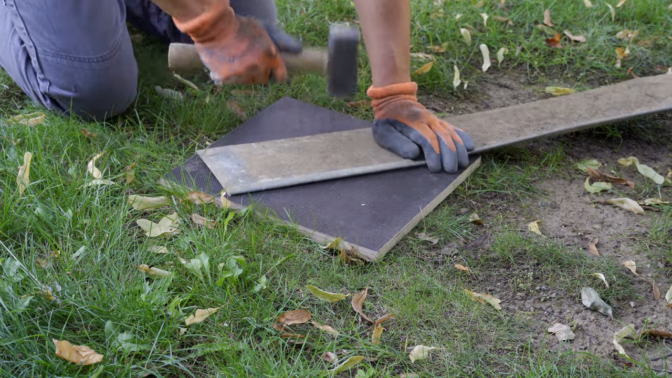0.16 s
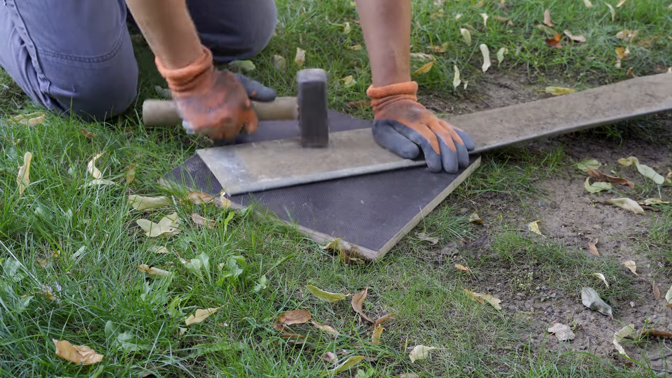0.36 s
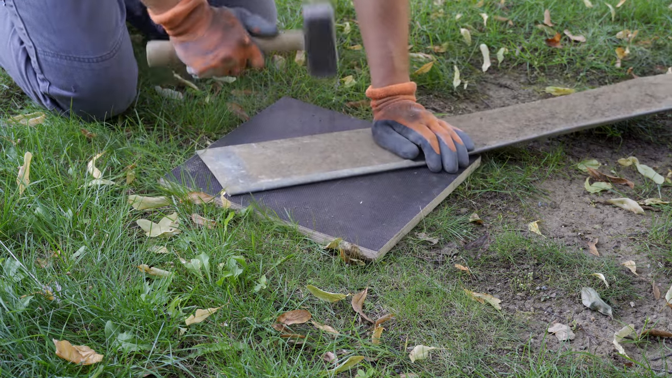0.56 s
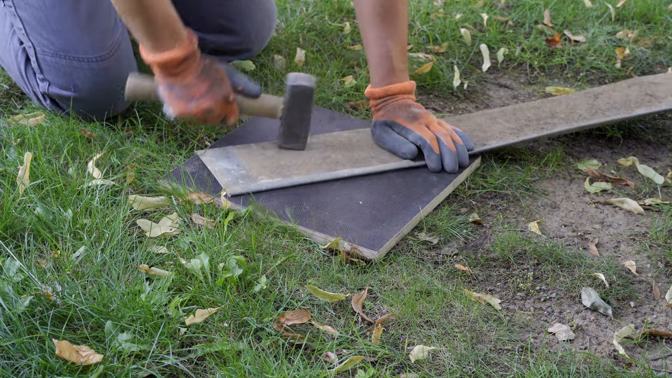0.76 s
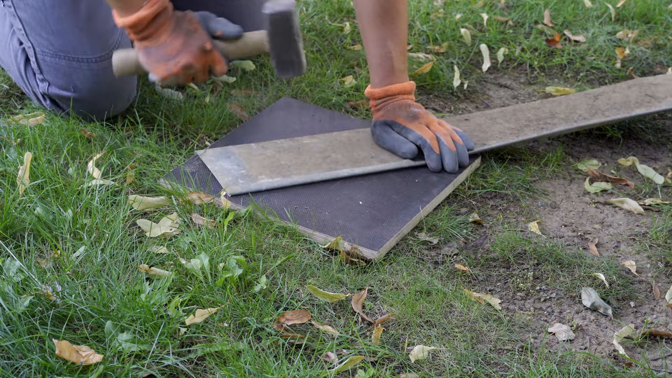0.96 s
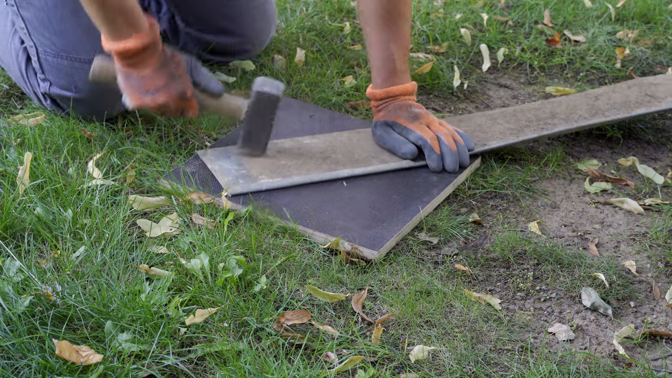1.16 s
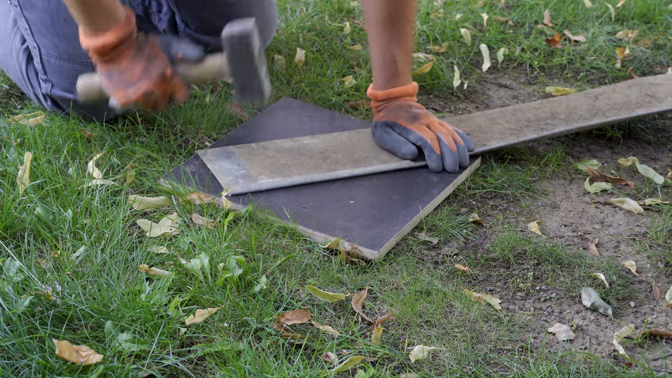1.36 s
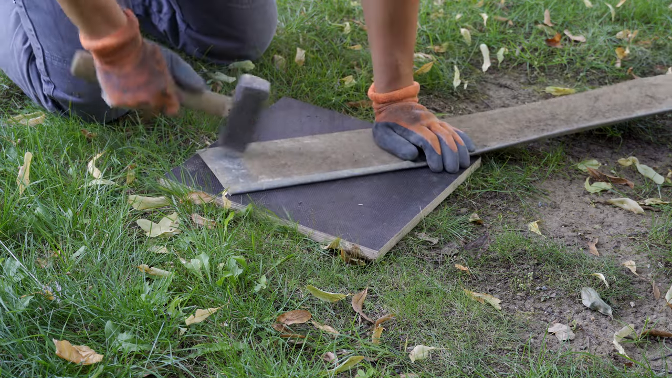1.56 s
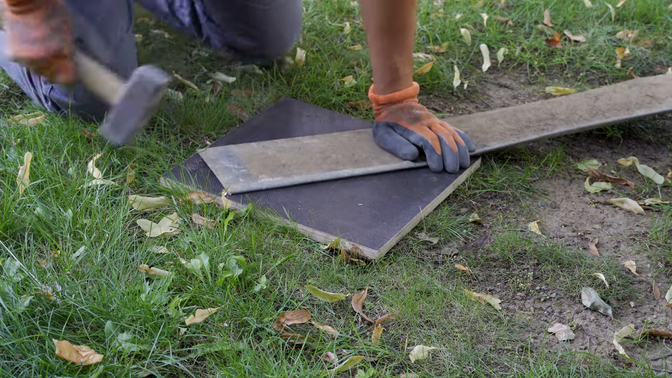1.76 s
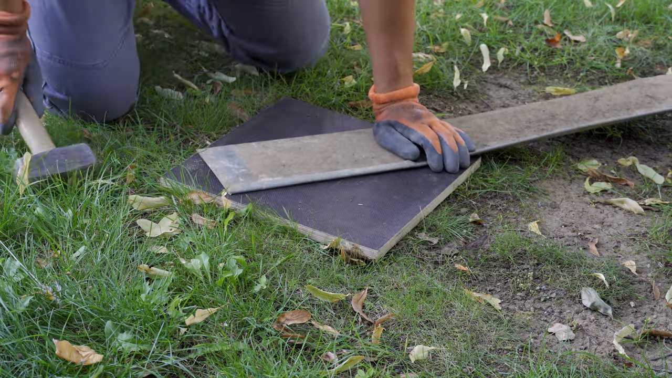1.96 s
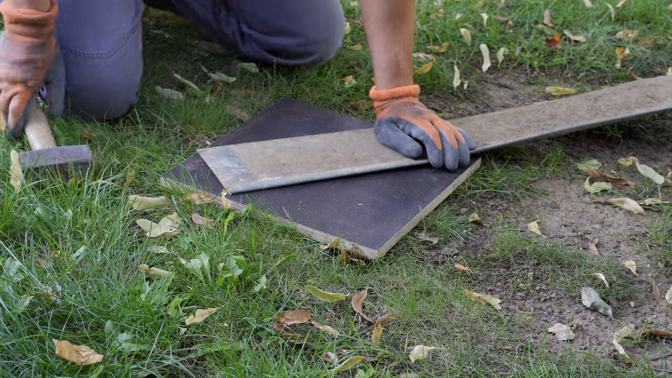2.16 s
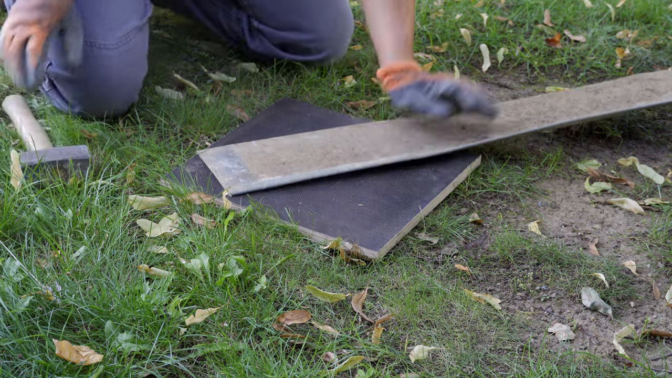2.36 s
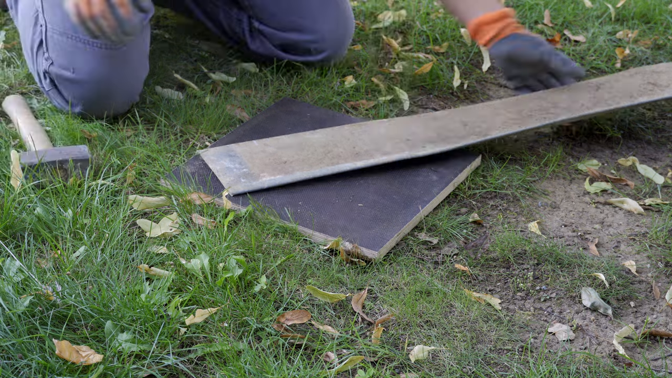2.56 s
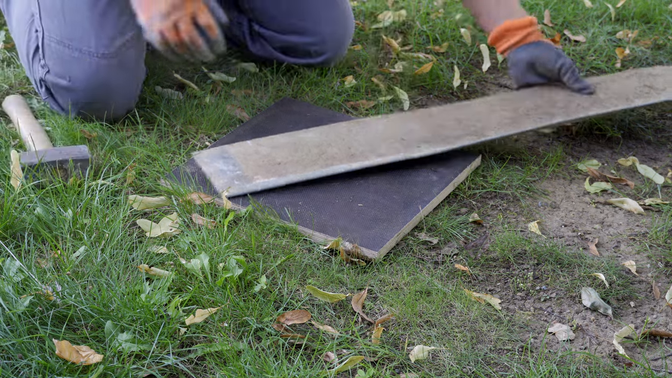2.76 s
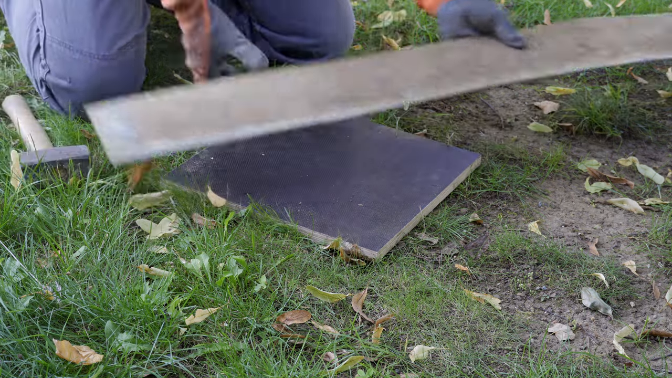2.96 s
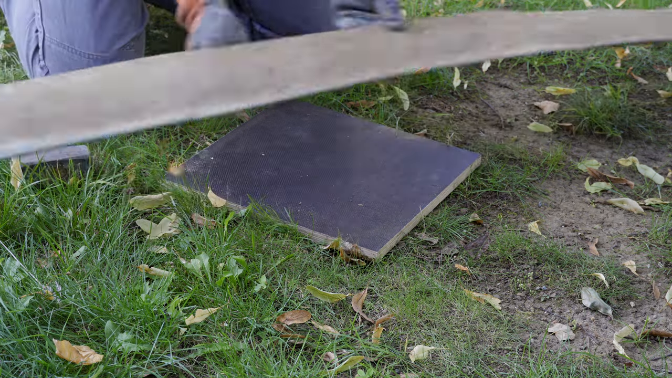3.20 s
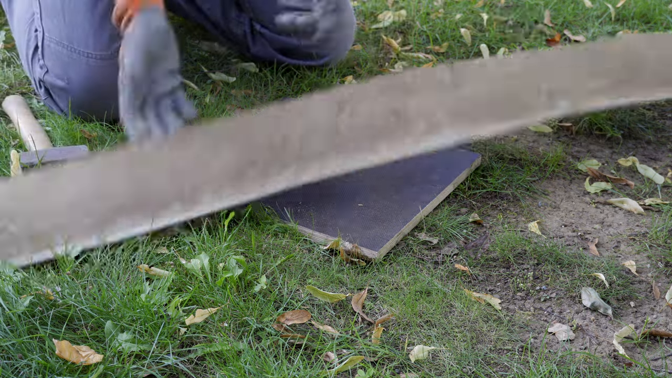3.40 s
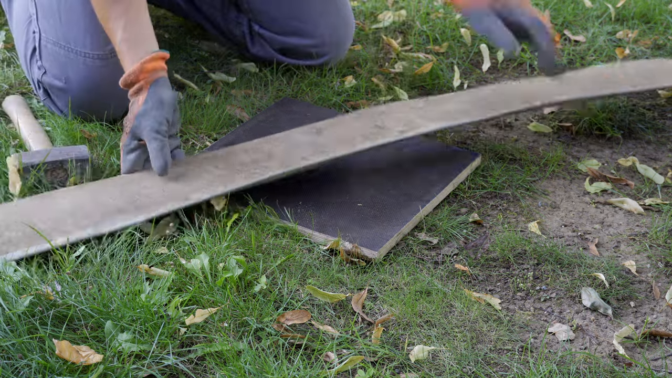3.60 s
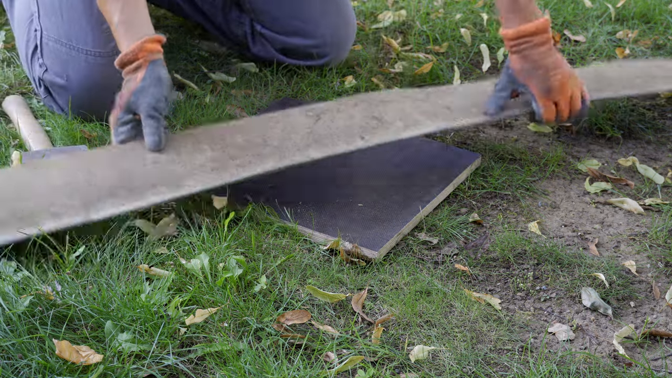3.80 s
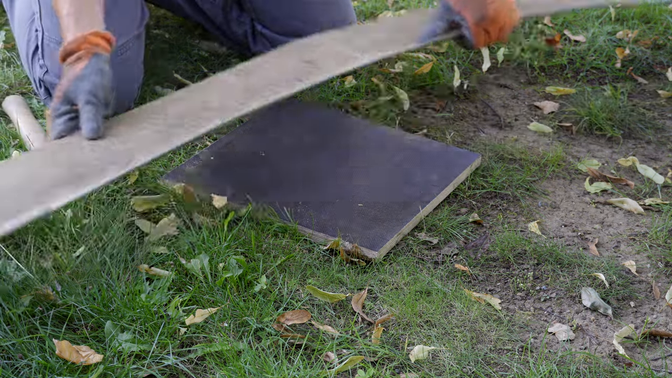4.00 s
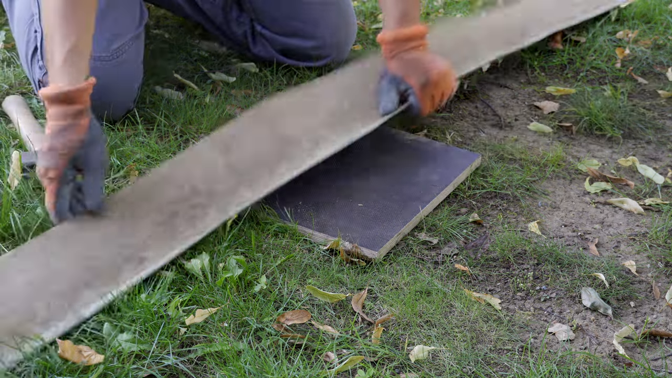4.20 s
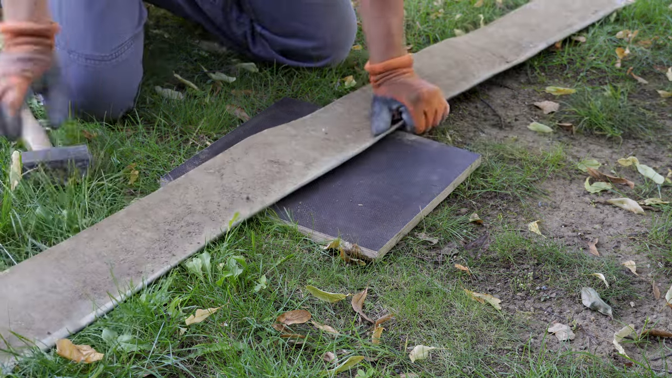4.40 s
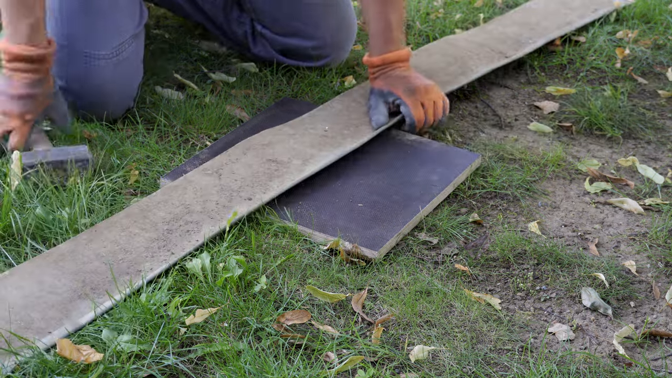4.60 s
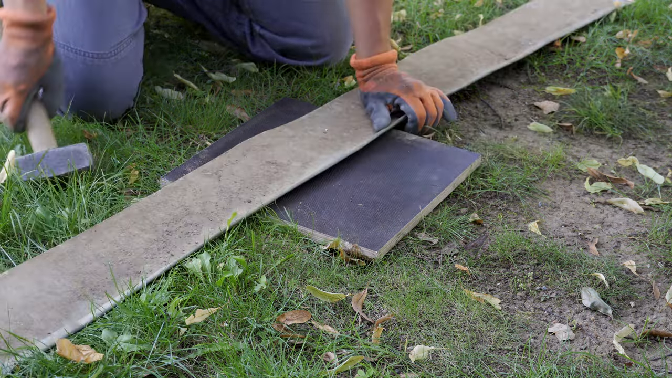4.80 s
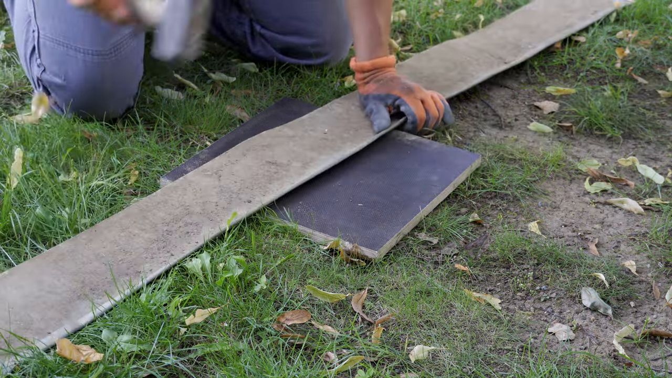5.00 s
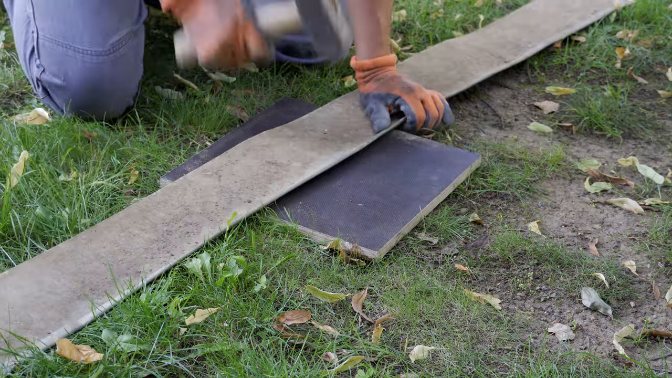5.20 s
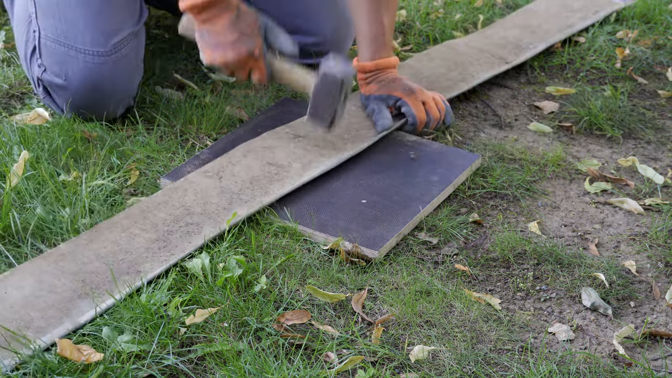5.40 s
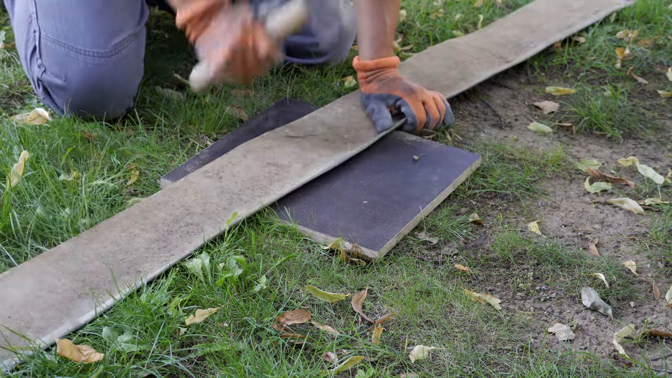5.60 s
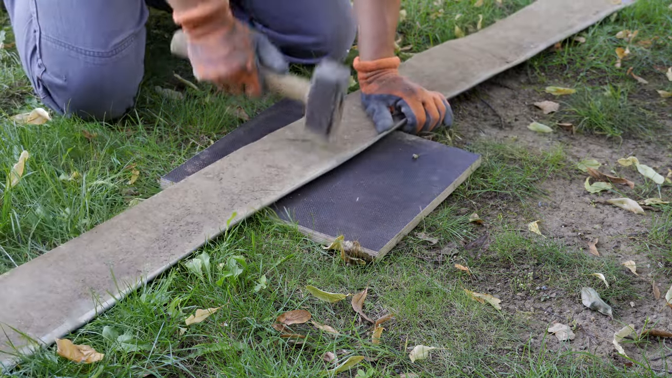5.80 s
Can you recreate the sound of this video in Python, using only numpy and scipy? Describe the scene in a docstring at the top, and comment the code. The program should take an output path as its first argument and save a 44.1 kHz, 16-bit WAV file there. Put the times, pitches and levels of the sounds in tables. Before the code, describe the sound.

A hammer strikes a thin metal strip on a board outdoors: five quick sharp clangs, a scraping repositioning pause, then two more clangs.

```python
"""Hammering a metal strip

A lump hammer flattens a long thin metal strip on a board lying in the grass.
Each blow is a crack (short noise), a loud thud (ringing board modes) and a dense clang (fading noise bands).
Between two runs of blows the hammer is put down and the strip is lifted, turned, dragged and dropped back,
made from knocks and gritty noise. Faint crackle and outdoor hush lie behind it all.
"""
import sys
import numpy as np
from scipy import signal
from scipy.fft import rfft, irfft
from scipy.io import wavfile

SR = 44100
rng = np.random.default_rng(int(sys.argv[2]) if len(sys.argv) > 2 else 0)


def waveform_to_disk(signal):
    """Save audio, clipped to [-1, 1], as 16-bit WAV at the path in sys.argv[1]."""
    frames = np.transpose(np.atleast_2d(signal))
    scaled = np.clip(frames, -1, 1) * 32767
    samples = np.round(scaled).astype(np.int16)
    wavfile.write(sys.argv[1], SR, samples)


N = 257984

# Hammer blows: start_s, thud_db, thud_centre_hz, clang_db, chatter_s, clang_tilt_db_per_octave,
# rebound_delay_s, rebound_db, low_thud_centre_hz, low_thud_db, hum_hz, hum_db
HAMMER_BLOWS = [(0.0324, 9, 575, -14.5, 0.02, 0.5, 0.046, -14.5, 261, -1.5, 690, -38.5),
                (0.3944, 8.5, 645, -13.5, 0.0271, 0, .046, -16.5, 205, -5, 690, -36.5),
                (0.7504, 11, 780, -13, 0.02, 0.5, 0.044, -11, 310, 3, 747, -38.5),
                (1.1201, 3.5, 773, -15.5, 0.027, 0, .04, -18, 410, 6.5, 744, -43.5),
                (1.4724, 5, 1270, -18, 0.031, 0, 0.02, -13.5, 445, 5.5, 1320, -45),
                (5.322, 14.5, 822, -11.5, 0.053, 0, 0.061, -39, 600.3, 14.5, 677, -41),
                (5.7200, 5, 1270, -12, 0.059, -1, 0.034, -18.5, 396, 5, 900, -40)]
# Strip and hammer knocking on board and ground; the first row is the dying ring of an earlier blow:
# start_s, level_db, treble_tilt_db_per_octave, ring_time_factor, wooden_body_boost_db
STRIP_KNOCKS = [(0, -56, -4.5, 0.84, 12), (1.813, -61.5, 0.5, 0.75, 9.5), (1.879, -60, -15, 0.33, 22),
                (2.004, -68, 13.5, 0.276, 0), (2.094, -70, 5, .2, 0), (2.21, -69, 8.5, 0.24, 0),
                (2.904, -44, -16, 1, 2), (3.46, -61, -10, .1, 11), (3.505, -51, -34, .6, 22),
                (3.805, -38.5, -6, 0.062, 11.5), (4.315, -22.5, -3, 0.71, 6.5),
                (4.396, -23.5, -18, 0.494, 9), (4.713, -51.5, -3, 0.79, 4), (4.738, -51, 2.5, 0.057, 5),
                (4.754, -46, 2, 0.084, 0), (4.766, -39, -11, 0.387, 14.5), (4.788, -60, 6, 0.88, 0),
                (4.844, -57, 4, 0.16, -1), (4.858, -53, 3, 0.21, 3), (4.925, -63, 4.5, 0.18, 0)]
# Ringing modes of the board: pitch_hz, level_db, time_to_fall_60_db_s
BOARD_MODES = [(228, 3.5, 0.027), (310, 5.5, 0.014), (393, 7, 0.011), (506, -0.5, 0.022), (640.3, 5, 0.012),
               (780, 8.5, 0.01), (900, 6.5, 0.011), (1270, 9, 0.01), (1646, 1, 0.0065)]
# Tone colour of the clang: pitch_hz, density_db_per_hz
CLANG_COLOUR = [(53, -44.5), (90, -22), (239, -5.5), (402, -7), (647, -3), (935, 0.5), (1380, 1),
                (1830, -1.5), (2710, -2), (3360, -3), (6720, -12), (8530, -15), (10600, -22.5),
                (13500, -24), (16000, -36)]
# How long the clang rings: pitch_hz, time_to_fall_60_db_s
CLANG_RING_TIMES = [(100, 0.98), (260, 0.46), (700, 0.43), (1840, 0.34), (4850, 0.3), (12800, 0.22)]
# Clearest bending modes of the strip: pitch_hz, level_db, time_to_fall_60_db_s
STRIP_MODES = [(420, -13, 0.2), (498, -11, .25), (572, -10.5, 0.33), (629, -7, 0.19), (690, -8.5, 0.12),
               (734.4, -6.5, 0.24), (823.5, -10.5, 0.15), (1087, -12.5, 0.28), (1320, -10, .25),
               (1680, -21.5, .25), (2031, -10.5, 0.23), (2280, -13, .25), (2750, -14, 0.35),
               (3337, -15, 0.22)]
# Tone colour of the strip rubbing on the board: pitch_hz, density_db_per_hz
RUB_COLOUR = [(59, -57), (100, -29), (172, -5.5), (281, -5.5), (371, -4.5), (461, -3.5), (721, 2.5),
              (1360, -7), (2160, -15.5), (4000, -29.5), (5200, -63.5), (8800, -120)]
# Tone colour of gloves and grass rustling: pitch_hz, density_db_per_hz
RUSTLE_COLOUR = [(590, -27.5), (1000, -5), (1280, -3), (1770, -4), (2620, -2), (4310, -6.5), (6700, -14.5),
                 (8650, -11), (10700, -27.5), (14200, -19.5), (16000, -30.5)]
# Tone colour of the outdoor hush: pitch_hz, density_db_per_hz
AIR_COLOUR = [(12, -43), (20, -18), (44, -2.5), (262, -11.5), (377, -18), (678, -19), (802, -21.5),
              (1090, -15), (1440, -23.5), (2530, -30.5), (16000, -41)]
# Low puffs on the microphone: start_s, level_db, pitch_hz, time_to_fall_60_db_s
LOW_PUFFS = [(5.721, -5.5, 21, 0.13), (5.795, -19.5, 25, .2)]
# Resonances of the microphone port: pitch_hz, width_hz, boost_db
MICROPHONE_PORT = [(8360, 1100, 5), (10270, 2300, -6.5), (13500, 6900, 4)]
# The strip is lifted, turned, dragged and lowered: time_s, rub_db, rustle_db, rub_tilt_db_per_octave
DRAG_LEVELS = [(2.76, -68, -69.5, 0), (2.764, -72, -67.5, -1), (2.866, -41, -35.5, 3.5),
               (2.892, -45, -37.5, 2.5), (2.914, -30.5, -41, 2.5), (3.062, -39, -46, 2.5),
               (3.17, -40.5, -41, 3), (3.468, -43, -44, 0.5), (3.492, -35.5, -47, -7),
               (3.614, -42, -51.5, -1), (3.64, -49, -47, -2), (3.756, -54.5, -60.5, -1),
               (3.856, -54, -46, -1.5), (3.96, -44.5, -44.5, -0.5), (4.028, -51, -61.5, 1.5),
               (4.162, -57, -61.5, -5), (4.218, -57.5, -52, 0), (4.244, -35, -44, -1),
               (4.31, -40.5, -46.5, -2.5)]
# Small stirrings of hands, knees and hammer: peak_s, spread_s, rub_db, rustle_db
SMALL_STIRS = [(1.92, 0.064, -66.5, -65), (2.008, 0.0075, -61.5, -57), (2.2, 0.077, -73, -69.5),
               (2.322, .012, -70.5, -66.5), (2.378, .015, -73.5, -71.5), (2.47, .04, -70, -77),
               (2.72, 0.034, -70, -67), (4.469, 0.033, -50.5, -64), (4.558, 0.036, -60, -57.5),
               (4.66, 0.0464, -65, -61), (4.9, 0.086, -67.5, -66.5), (5.089, .035, -69, -66.5),
               (5.2, 0.075, -66.5, -87)]

AIR_DB = -63.5
GARDEN_DB, GARDEN_T60_S = -17.5, 0.76   # echoes off fences and walls
HUM_DELAY_S, HUM_HELD_S, HUM_T60_S = 0.09, 0.093, 0.33
STIR_TILT_DB_PER_OCTAVE = -3.5
BODY_HZ, BODY_OCTAVES = 432, 1   # wooden body: centre and spread of its boost
SLAP_ON_BOARD_DB = -4   # how much of a rebound reaches the board
CUTOFF_HZ = 16000


def clang():
    """The strip has too many modes to count: each band rings and decays at its own pace."""
    out = np.zeros(N)
    contacts = metallic(grains(per_s=11000, spread_db=1.0), depth_db=1.25, width_hz=40)
    # The slap back also rattles the strip.
    rebounds = [(blow[0] + blow[6], blow[7], 0, 0.25, 0) for blow in HAMMER_BLOWS]
    for hz, band in bands(contacts, CLANG_COLOUR):
        power = np.zeros(N)
        t60 = at_hz(CLANG_RING_TIMES, hz)
        octaves = np.log2(hz / 1500)
        for s, _, _, level_db, chatter_s, tilt, *_ in HAMMER_BLOWS:
            hold_s = chatter_s * (hz / 1500) ** -0.15   # treble leaves the chatter first
            start, direct = envelope(s, hold_s, t60)
            age = np.arange(len(direct)) / SR
            sag = from_db(-40 * np.minimum(age, hold_s))   # chatter weakens by 40 dB per s
            echo_gain = from_db(GARDEN_DB - 2.7 * octaves)
            echo = echo_gain * envelope(s, hold_s, GARDEN_T60_S)[1]
            blow_power = from_db(2 * (level_db + tilt * octaves))
            power[start:start + SR] += blow_power * ((sag * direct) ** 2 + echo ** 2)
        for s, level_db, tilt, ring_factor, body_db in list(STRIP_KNOCKS) + rebounds:
            start, direct = envelope(s, 0.0021, t60 * ring_factor)
            treble_db = tilt * max(np.log2(hz / 1900), 0)
            wood_db = body_db * np.exp(-(np.log2(hz / BODY_HZ) / BODY_OCTAVES) ** 2)
            power[start:start + SR] += (from_db(level_db + treble_db + wood_db) * direct) ** 2
        flicker = from_db(1.4 * drift(25))
        out += band * np.sqrt(power) * flicker
    return out


def thuds():
    """Where the blow lands picks two groups of board modes; the strip slaps back once."""
    columns = np.transpose(HAMMER_BLOWS)
    s, thud_db, centre_hz, _, _, _, rebound_s, rebound_db, low_hz, low_db, *_ = columns
    out = np.zeros(N)
    delay_s = 0.0006   # the board follows the first contact
    for k, (hz, db, t60) in enumerate(BOARD_MODES):
        main_group = from_db(thud_db - 90 * np.log2(hz / centre_hz) ** 2)
        low_group = from_db(low_db - 90 * np.log2(hz / low_hz) ** 2)
        slap_db = rebound_db + SLAP_ON_BOARD_DB + rng.normal(0, 3.7, len(s))
        clicks = np.zeros(N)
        clicks[((s + delay_s) * SR).astype(int)] = (main_group + low_group) * from_db(db)
        clicks[((s + rebound_s) * SR).astype(int)] = from_db(db + slap_db)
        out += ring(clicks * (-1) ** k, hz, t60)   # neighbouring modes start in opposite directions
    # A small board sends out no bass.
    return signal.sosfilt(signal.butter(2, 160, "high", fs=SR, output="sos"), out)


def cracks():
    """Steel meets steel: a bright burst of a few milliseconds."""
    loudness = np.zeros(N)
    for s, *_ in HAMMER_BLOWS:
        start, burst = envelope(s, 0.00093, 0.038)
        loudness[start:start + SR] += from_db(-3.0) * burst
    colour = [(900, 3.5), (3000, 4), (8500, -9), (16000, -20.5)]   # pitch_hz, density_db_per_hz
    return loudness * sum(band for _, band in bands(rng.standard_normal((2, N)), colour))


def strip_tones():
    """The clearest bending modes, shaken at random by the chatter; rubbing mainly reaches the low ones."""
    shake = np.zeros(N)
    rubbed = from_db(-33.0) * handling_level(column=1)
    for s, _, _, level_db, chatter_s, *_ in HAMMER_BLOWS:
        start, fed = envelope(s, chatter_s, 0.17)
        shake[start:start + SR] += from_db(level_db - 36.5) * fed
    out = np.zeros(N)
    for hz, db, t60 in STRIP_MODES:
        force = shake + rubbed / (1 + (hz / 900) ** 4)
        out += ring(from_db(db) * force * rng.standard_normal(N), hz, t60)
    return out


def afterring():
    """The free end of the strip gives an uneven hum that outlasts the clang."""
    out = np.zeros(N)
    for s, *_, hz, db in HAMMER_BLOWS:
        start, fed = envelope(s + HUM_DELAY_S, HUM_HELD_S, HUM_T60_S)
        # Noise through two short rings keeps a rough pitch.
        once = ring(rng.standard_normal(len(fed)), hz, 0.014)
        hum = rms_one(ring(once, hz, 0.014))
        out[start:start + SR] += from_db(db) * fed * hum
    return out


def handling():
    """Gritty rubbing through the low strip modes and a finer rustle, both patchy."""
    tilt = drag_curve(column=3)
    tilt = np.where(tilt < -50, STIR_TILT_DB_PER_OCTAVE, tilt.clip(-12, 12))   # outside the drag: stirs
    rub_grains = metallic(grains(per_s=3400, spread_db=1.0), depth_db=4.0, width_hz=30)
    rub = sum(band * from_db(2.1 * drift(34) + tilt * np.log2(hz / 700))
              for hz, band in bands(rub_grains, RUB_COLOUR))
    rustle_grains = metallic(grains(per_s=5000, spread_db=0.0), depth_db=3.0, width_hz=40)
    rustle = sum(band * from_db(0.9 * drift(8.8)) for _, band in bands(rustle_grains, RUSTLE_COLOUR))
    patchy = from_db(0.75 * drift(30) + 1.53 * drift(4))
    return handling_level(column=1) * rub + handling_level(column=2) * patchy * rustle


def crackle():
    """Dry leaves and grass stalks snap now and then under knees and hands."""
    sizes = np.abs(grains(per_s=25, spread_db=5.0)[0])
    snaps = signal.lfilter([1], [1, -0.97], sizes) * rng.standard_normal(N)
    busy = from_db(-65.0 + 3.0 * drift(2))
    return busy * signal.sosfilt(signal.butter(1, [2500, 9000], "band", fs=SR, output="sos"), snaps)


def air():
    """Distant outdoor hush of slowly wavering noise, and low puffs with the last blow."""
    noise = rng.standard_normal((2, N))
    hush = sum(band * from_db(1.1 * drift(3)) for _, band in bands(noise, AIR_COLOUR))
    out = from_db(AIR_DB) * hush
    for s, db, hz, t60 in LOW_PUFFS:
        click = np.arange(N) == round(s * SR)
        out += ring(from_db(db) * click, hz, t60)
    return out


def handling_level(column):
    """Rubbing (1) or rustling (2): the drag, plus stirrings that swell and fade like a bell curve."""
    t = np.arange(N) / SR
    power = from_db(2 * drag_curve(column))
    for s, spread_s, *db in SMALL_STIRS:
        power += from_db(2 * db[column - 1]) * np.exp(-((t - s) / spread_s) ** 2)
    return np.sqrt(power)


def drag_curve(column):
    """One column of the drag table joined by straight lines, -120 outside it."""
    rows = np.array(DRAG_LEVELS)
    return np.interp(np.arange(N) / SR, rows[:, 0], rows[:, column], left=-120, right=-120)


def metallic(source, depth_db, width_hz):
    """Crowded narrow modes of the sheet: an uneven comb of peaks over the whole spectrum."""
    spectrum = rfft(source)
    knots = rng.standard_normal(round(SR / 2 / width_hz) + 2)
    places = np.linspace(0, len(knots) - 1, N // 2 + 1)
    comb_db = depth_db * np.interp(places, np.arange(len(knots)), knots)
    return irfft(spectrum * from_db(comb_db), N)


def grains(per_s, spread_db):
    """Two trains of tiny random contacts of uneven size."""
    unevenness = np.minimum(rng.exponential(1, (2, N)), 5)
    sizes = from_db(spread_db * unevenness) * rng.standard_normal((2, N))
    return sizes * (rng.random((2, N)) < per_s / SR)


def bands(source, spectrum):
    """Third-octave slices of two alternating sources, coloured so that their powers sum to 1."""
    edges = 20 * 2 ** (np.arange(30) / 3)
    centres = np.sqrt(edges[1:] * edges[:-1])
    # Wider bands hold more power; bands below the first table point stay silent.
    gains = from_db(at_hz(spectrum, centres)) * np.sqrt(centres) * (centres > spectrum[0][0])
    for k, hz in enumerate(centres):
        if gains[k]:
            sos = signal.butter(2, edges[k:k + 2], "band", fs=SR, output="sos")
            band = rms_one(signal.sosfilt(sos, source[k % 2]))
            yield hz, band * gains[k] / np.linalg.norm(gains)


def ring(clicks, hz, t60):
    """A unit click sets a sine of height 1 ringing, which falls by 60 dB in t60 seconds."""
    r = from_db(-60 / (t60 * SR))
    w = 2 * np.pi * hz / SR
    return signal.lfilter([0, np.sin(w)], [1, -2 * r * np.cos(w), r * r], clicks + 1e-18)


def envelope(s, hold_s, t60):
    """Start index and level of a ring that is fed for hold_s, then dies away."""
    start = round(s * SR)
    age = np.arange(min(N - start, SR)) / SR
    return start, from_db(-60 * np.maximum(age - hold_s, 0) / t60)


def drift(rate_hz):
    """Slow chance: noise through a double one-pole low-pass, with a spread of 1."""
    r = np.exp(-80 * np.pi * rate_hz / SR)   # computed at every 40th sample
    noise = rng.standard_normal(N // 40 + 2002)
    slow = signal.lfilter([1], [1, -2 * r, r * r], noise)[2000:]   # skip the filter's start
    return np.interp(np.arange(N) / 40, np.arange(len(slow)), rms_one(slow))


def at_hz(points, hz):
    """Read a table between its points, along a logarithmic pitch scale."""
    table = np.array(points)
    return np.interp(np.log(hz), np.log(table[:, 0]), table[:, 1])


def rms_one(x):
    """Scale a sound to an average (RMS) level of 1."""
    return x / np.sqrt(np.mean(x ** 2) + 1e-20)


def from_db(db):
    """Turn decibels into a plain multiplier."""
    return 10 ** (np.asarray(db) / 20)


def scene():
    """Add all the sounds together as one channel."""
    blows = clang() + thuds() + cracks() + strip_tones() + afterring()
    return (blows + handling() + crackle() + air())[None]


def record(dry):
    """Microphone colour; the input clips flat, a gain control ducks a few ms late; bass and top are cut."""
    for hz, width_hz, db in MICROPHONE_PORT:
        peak = signal.lfilter(*signal.iirpeak(hz, hz / width_hz, fs=SR), dry)
        dry = dry + (from_db(db) - 1) * peak
    clipped = np.clip(dry, -1, 1)
    loud = signal.lfilter([0.004], [1, -0.996], np.maximum(np.abs(clipped) - 0.4, 0))
    ducked = 0.93 * clipped / (1 + 1.2 * loud)
    no_bass = signal.lfilter(*signal.butter(1, 25, "high", fs=SR), ducked)
    top_cut = signal.cheby2(12, 50, CUTOFF_HZ + 400, fs=SR, output="sos")
    return np.clip(signal.sosfilt(top_cut, no_bass), -1, 1)


dry = scene()
out = record(dry)
waveform_to_disk(out)
```